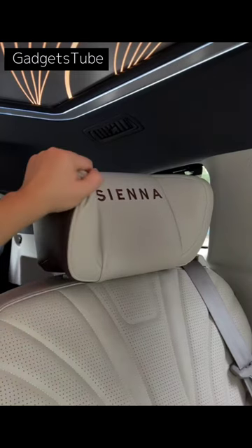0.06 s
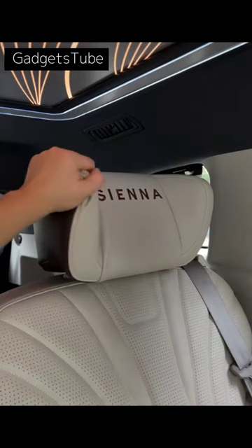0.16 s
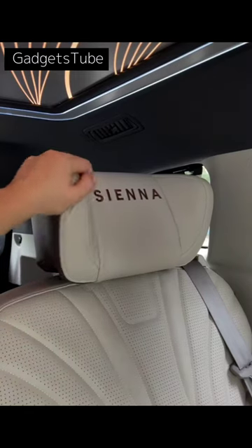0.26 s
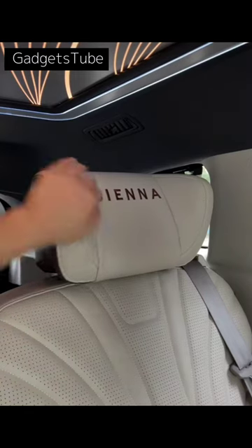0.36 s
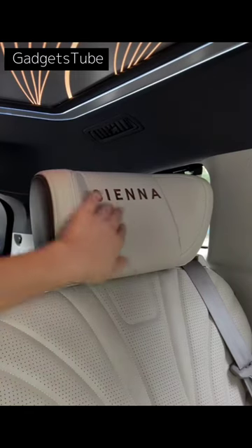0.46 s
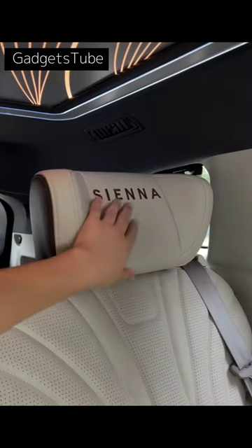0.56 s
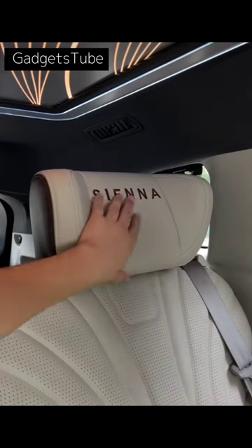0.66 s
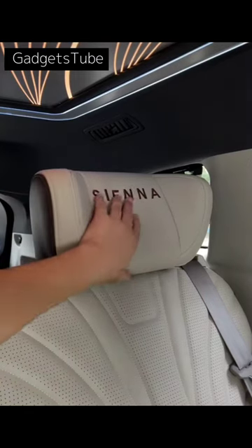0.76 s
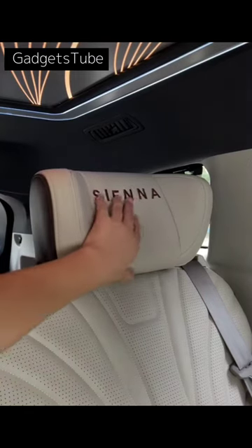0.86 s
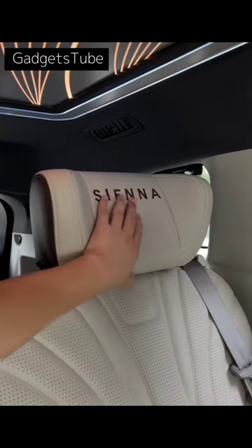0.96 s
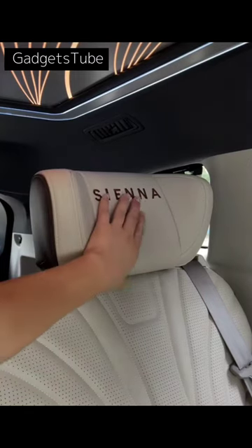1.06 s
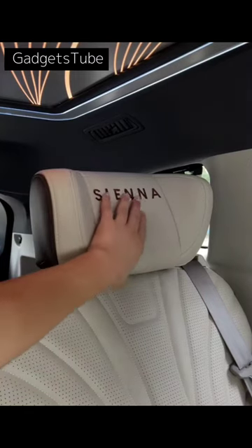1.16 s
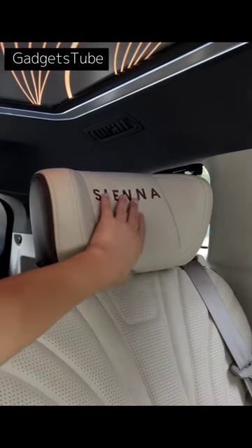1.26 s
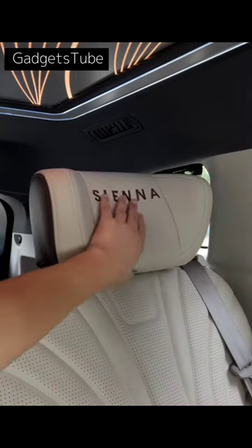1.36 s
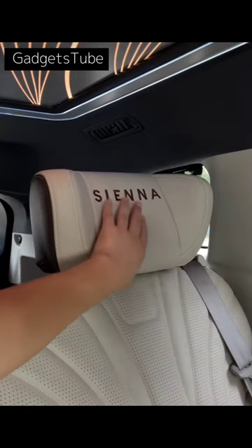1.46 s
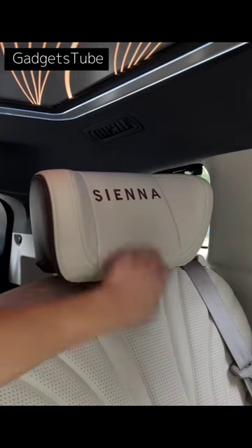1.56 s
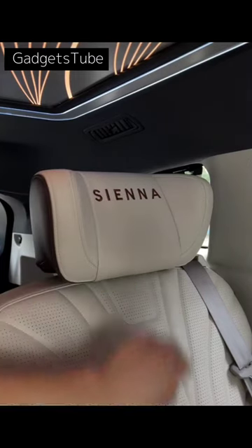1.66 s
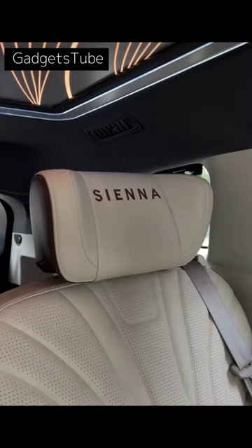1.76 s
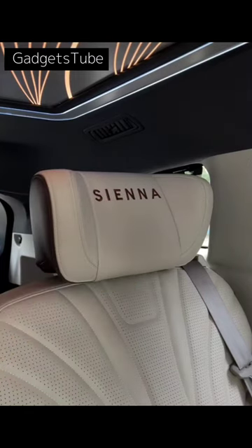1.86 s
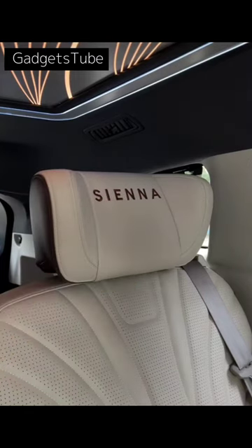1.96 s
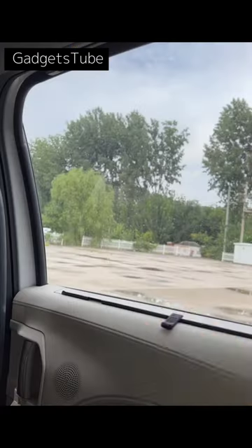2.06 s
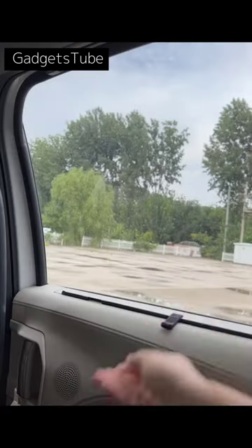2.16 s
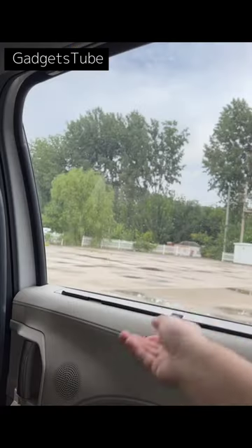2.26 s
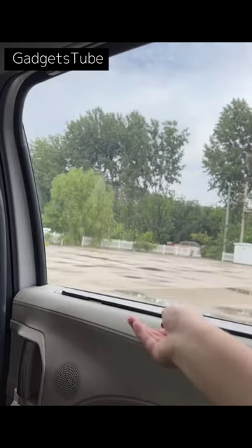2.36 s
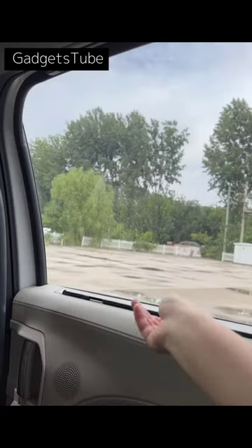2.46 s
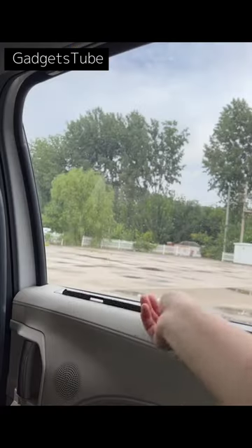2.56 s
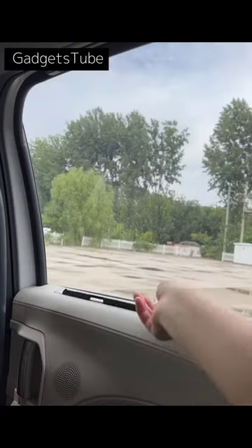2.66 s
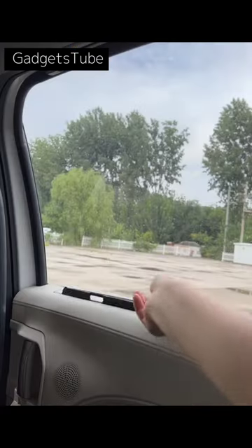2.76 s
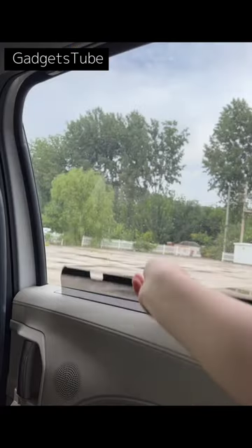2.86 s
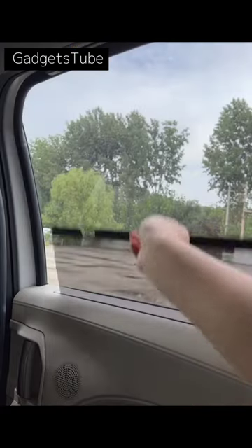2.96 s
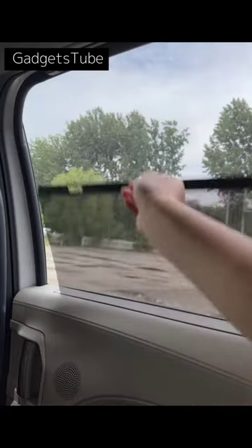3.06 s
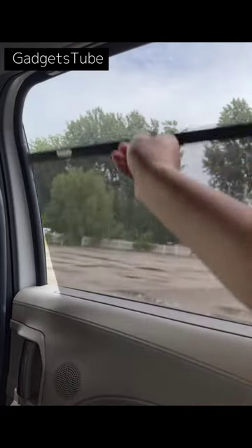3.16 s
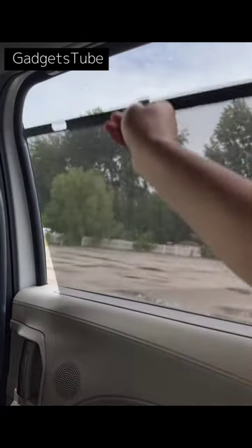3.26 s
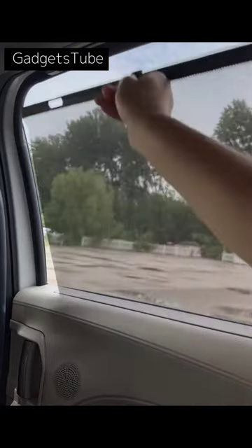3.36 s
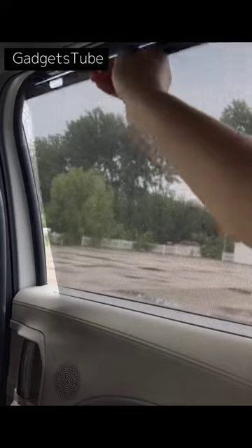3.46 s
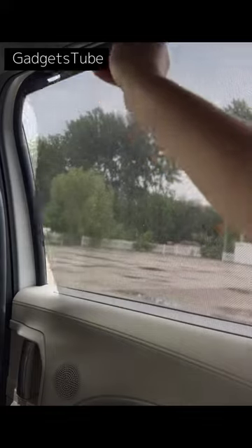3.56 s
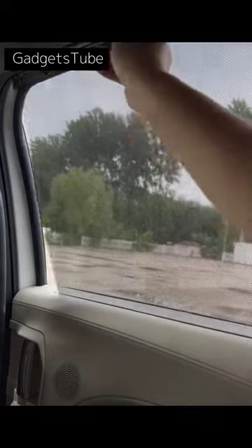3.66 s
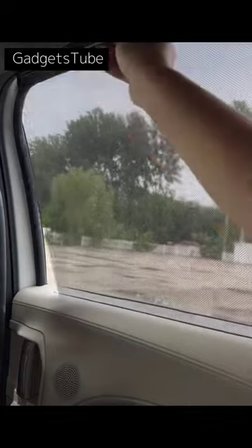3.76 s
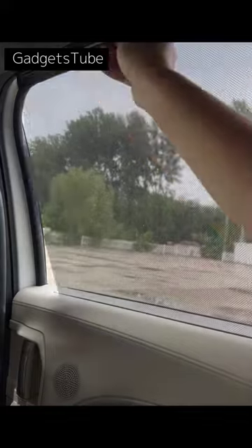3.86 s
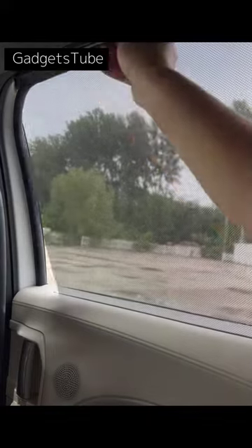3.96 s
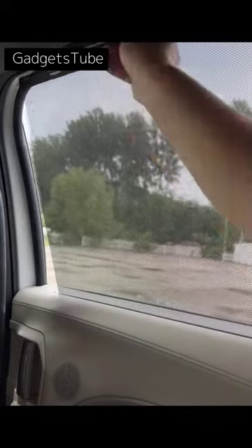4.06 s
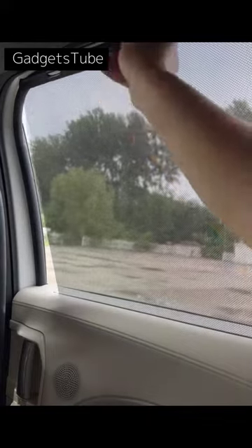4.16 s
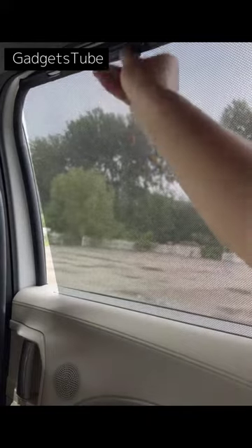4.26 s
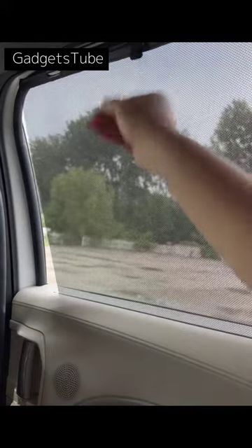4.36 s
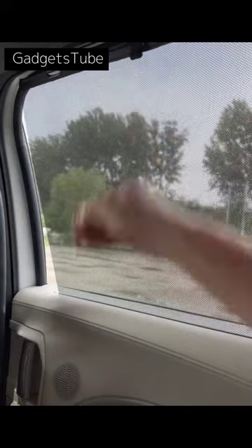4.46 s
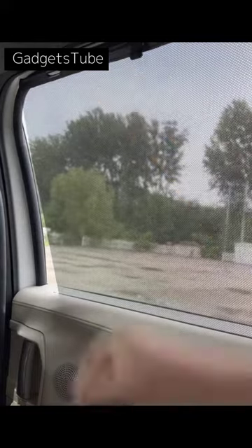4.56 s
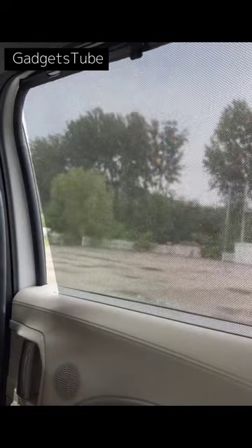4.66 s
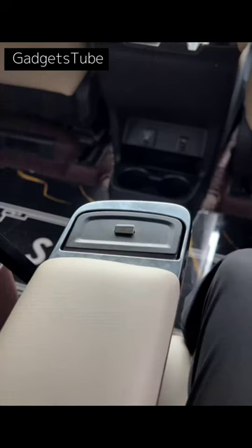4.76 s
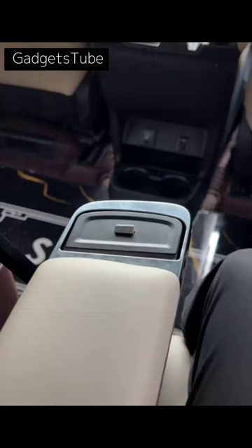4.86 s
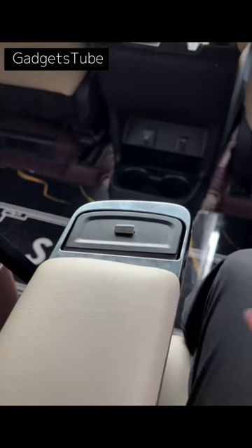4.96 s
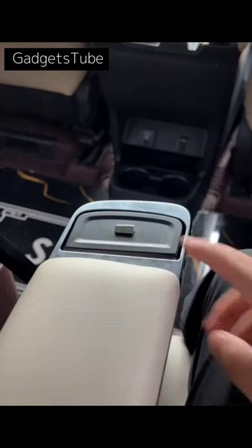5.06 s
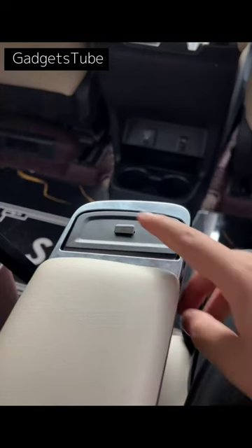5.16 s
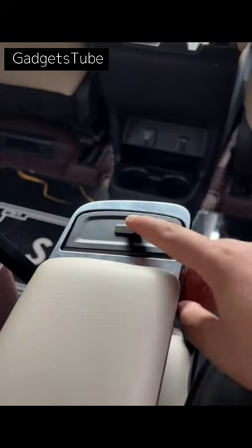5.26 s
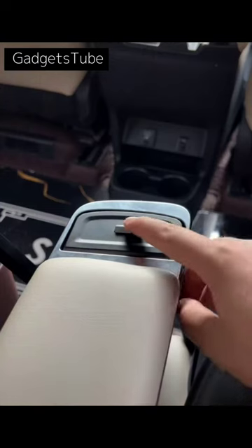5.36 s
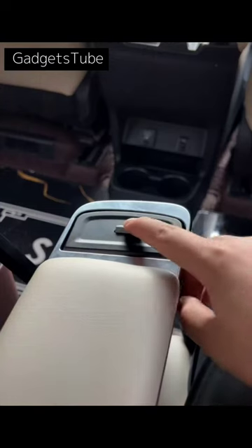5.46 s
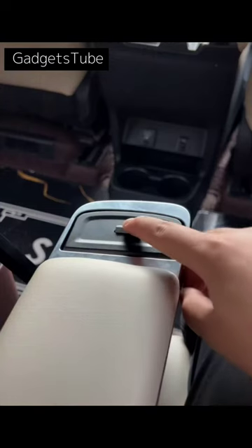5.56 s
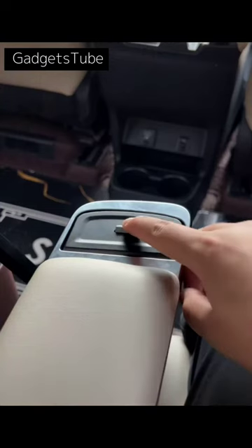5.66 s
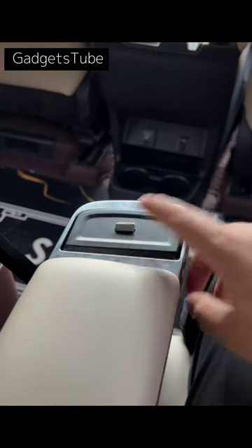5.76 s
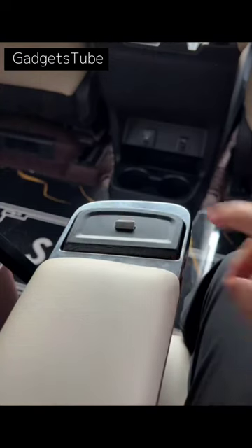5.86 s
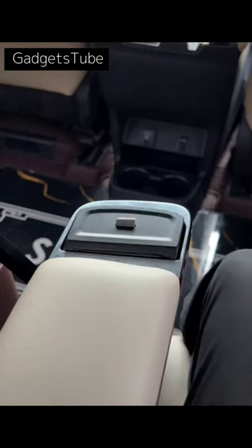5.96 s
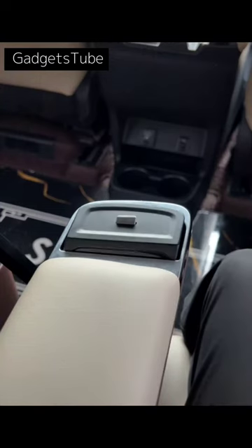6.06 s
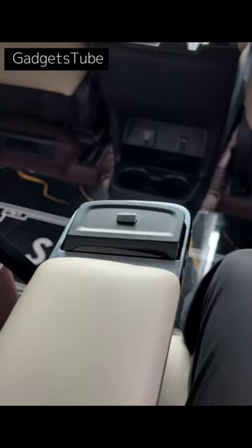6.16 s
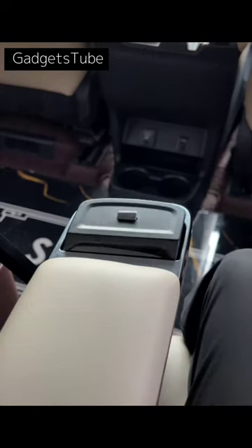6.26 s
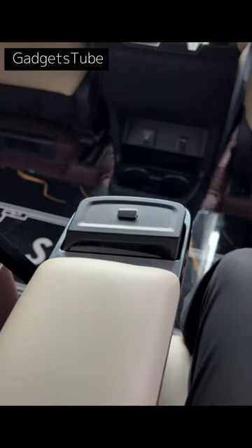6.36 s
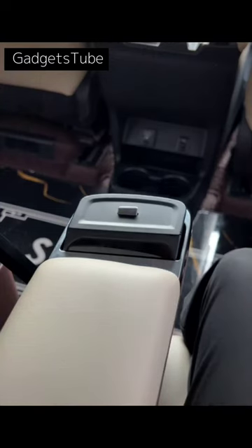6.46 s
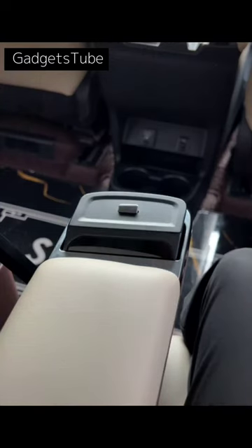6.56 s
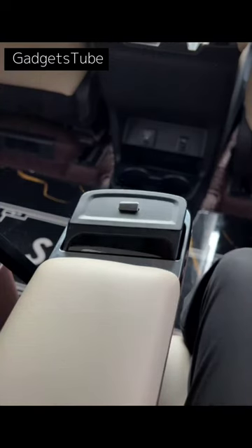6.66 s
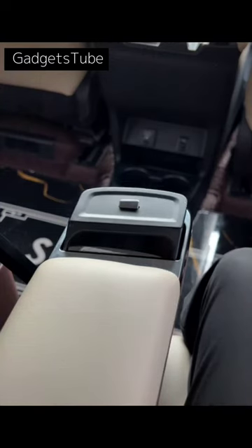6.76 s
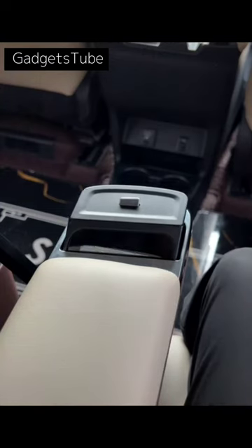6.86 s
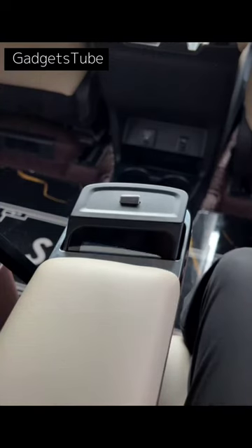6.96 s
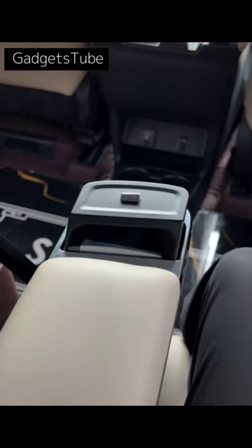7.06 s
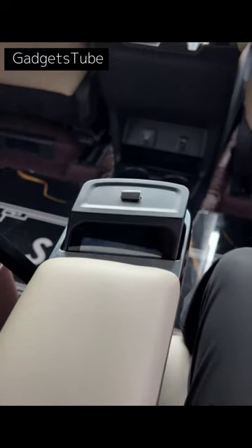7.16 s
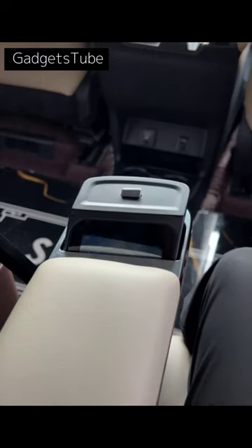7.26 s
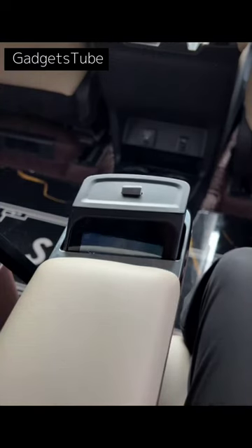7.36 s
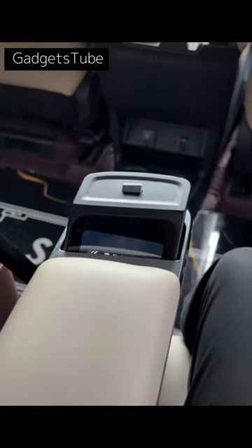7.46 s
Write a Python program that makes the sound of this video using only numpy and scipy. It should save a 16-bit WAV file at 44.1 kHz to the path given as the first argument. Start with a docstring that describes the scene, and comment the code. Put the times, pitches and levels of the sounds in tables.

```python
"""Inside a parked van, a hand strokes and bends a leather headrest over a low hum that stops at 2.06 s.
A roller blind is then gripped and pulled up the side window, its mesh hissing and singing lower and lower.
It is hooked in with a thump, and the hollow door booms on. Fingertips land on a lid and a button clicks.
A latch lets go, and a small geared motor hums and whines as it raises a screen along scraping rails.
Rubbing is made from random slips, knocks from dying resonances, and the motor from multiples of its shaft speed."""
import sys
import numpy as np
from scipy import signal
from scipy.fft import rfft, irfft, next_fast_len
from scipy.io import wavfile
from scipy.ndimage import uniform_filter1d

SR = 44100
rng = np.random.default_rng(int(sys.argv[2]) if len(sys.argv) > 2 else 0)


def wav_out(sig):
    """Save sig, one row per channel (or a flat mono array), as 16-bit PCM at SR to the path in sys.argv[1]."""
    wavfile.write(sys.argv[1], SR, np.round(np.clip(np.atleast_2d(sig).T, -1, 1) * 32767).astype(np.int16))


N = 331720
TIME = np.arange(N) / SR


def amp(db):
    """Turns decibels into a plain gain."""
    return 10 ** (np.asarray(db) / 20)


def unit(x):
    """Scales a sound to an rms of 1."""
    return x / np.sqrt(np.mean(x ** 2) + 1e-20)


def read(points, hz):
    """Reads a table between its points, along a log-frequency axis."""
    f, value = np.transpose(points)
    return np.interp(np.log(hz + 1), np.log(f + 1), value)


def follow(points, **ends):
    """Reads a table of (time, value) at every sample."""
    return np.interp(TIME, *np.transpose(points), **ends)


def add(mix, s, sound):
    """Adds a short sound to the mix at s seconds."""
    part = mix[:, round(s * SR):][:, :sound.shape[-1]]
    part += sound[..., :part.shape[1]]


def colour(x, spectrum):
    """Filters a sound by a table of (frequency [Hz], level [dB])."""
    size = next_fast_len(N, real=True)
    gain = amp(read(spectrum, np.fft.rfftfreq(size, 1 / SR)))
    return irfft(rfft(x, size) * gain, size)[..., :N]


def drift(hz):
    """Random wandering with an rms of 1, mostly slower than hz."""
    t = TIME[::64]
    smoothing = 1 + (np.fft.rfftfreq(len(t), t[1]) / hz) ** 4
    slow = irfft(rfft(rng.standard_normal(len(t))) / smoothing, len(t))
    return np.interp(TIME, t, unit(slow))


def stereo(pair):
    """Puts the direct sound in the middle and cabin reflections at the sides."""
    direct, reflected = pair
    return np.array([direct + .4 * reflected, direct - .4 * reflected])


def widen(pair, spectrum):
    """Spreads a sound between the microphones, band by band."""
    middle = pair.mean(0)
    return middle + colour(pair - middle, spectrum)


def noise(spectrum):
    """Steady coloured noise with an rms of 1."""
    return unit(stereo(colour(rng.standard_normal((2, N)), spectrum)))


def friction(spectrum, slips_per_s, spread_db, patchy_db):
    """Tiny slips of uneven size, coloured by the surface; its level flickers in patches over time and pitch."""
    slips = rng.random(N) < slips_per_s / SR
    size = slips * amp(spread_db * np.minimum(rng.exponential(1, N), 4))
    z = signal.stft(colour(size * rng.standard_normal((2, N)), spectrum), nperseg=512)[2]
    # random patches, smoothed over frequency and then over time
    patches = uniform_filter1d(rng.standard_normal(z.shape[1:]), size=4, axis=0)
    patches = unit(uniform_filter1d(patches, size=7, axis=1))
    return unit(stereo(signal.istft(z * amp(patchy_db * patches), nperseg=512)[1][:, :N]))


def ramp(start, rise_s):
    """Rises smoothly from 0 to 1 and stays there."""
    return np.sin(np.pi / 2 * np.clip((TIME - start) / rise_s, 0, 1)) ** 2


LAND_S, SLOWING_DB_PER_S, LIFT_DB_PER_S = 0.05, 59, 432


def rub(start, length):
    """Gain of one rub: it lands, fades as it slows, and lifts off."""
    t = np.maximum(TIME - start, 0)
    lift = np.maximum(t - length, 0)
    return ramp(start, LAND_S) * amp(-SLOWING_DB_PER_S * t - LIFT_DB_PER_S * lift)


# colour of the cabin air: (frequency [Hz], level [dB])
AIR = [(15, -41), (25, -3), (66, 5), (925, -33), (1950, -25.5), (3330, -35), (5930, -34), (9500, -39),
       (12000, -70.5)]
# how wide the air spreads: (frequency [Hz], extra width [dB])
AIR_WIDTH = [(70, 9), (200, 16.5), (900, 16.5), (2000, 6.5), (8000, -2)]
# colour of the early low hum: (frequency [Hz], level [dB])
LOW_HUM = [(20, -46), (52, 4), (72, 4), (98, -5), (126, 5.5), (150, -7), (195, -15), (265, -8),
           (320, -24.5), (2000, -78)]
AIR_DB, LOW_HUM_DB, LOW_HUM_END_S = -49, -30.5, 2.06


def cabin():
    """Faint air comes from all round and wavers; a low hum of filtered noise cuts out."""
    waver_db = 1.4 * drift(hz=8)
    air = amp(AIR_DB + waver_db) * widen(noise(AIR), AIR_WIDTH)
    running = np.clip((LOW_HUM_END_S - TIME) / 0.0061, 0, 1)
    return air + amp(LOW_HUM_DB) * running * noise(LOW_HUM)


# hand on leather and cloth: (time [s], length [s], friction level [dB], padding level [dB])
STROKES = [(-0.006, 0.17, -51, -48), (0.23, 0.088, -38.5, -40.5), (0.303, 0.11, -38, -40),
           (0.408, 0.24, -33.5, -38.5), (0.625, 0.15, -47.5, -39.5), (0.978, 0.19, -45.5, -37.5),
           (1.48, 0.062, -39, -29), (1.535, 0.055, -32, -62), (2.057, 0.023, -36.5, -30.5),
           (4.172, 0.13, -51.5, -44), (4.673, 0.035, -66, -38.5), (4.871, 0.25, -44, -81)]
# colour of skin on leather: (frequency [Hz], level [dB])
LEATHER = [(700, -14), (1200, -12.5), (2600, -5.5), (4600, -10.5), (7600, -6.5), (10500, -22.5),
           (13000, -39)]
# colour of the foam under the leather: (frequency [Hz], level [dB])
PADDING = [(150, -18), (330, 0), (550, -5), (900, -14), (1400, -14), (4000, -45)]


def hand():
    """Skin drags over leather in tiny slips; the padding answers dully."""
    grain = friction(LEATHER, slips_per_s=19000, spread_db=-0.5, patchy_db=2.5)
    padding = friction(PADDING, slips_per_s=3500, spread_db=1.0, patchy_db=3.5)
    return sum(rub(s, length) * (amp(grain_db) * grain + amp(padding_db) * padding)
               for s, length, grain_db, padding_db in STROKES)


# short hard clicks, mostly of plastic trim; the faint one at 4.734 s comes just before a gap:
# (time [s], body level [dB], then against the body: low [dB], edge [dB], tick [dB];
# base decay time t60 [s])
CLICKS = [(0.794, -42.5, -2, 0.5, 2, 0.037), (1.008, -28.5, 7.5, -10.5, -11, 0.061),
          (1.248, -38.5, 4, -8.5, -7, 0.097), (1.507, -24.5, 8, -21, -34, 0.048),
          (2.091, -28, -1.5, -16, -42, 0.073), (2.281, -38.5, 2, -40, -35, 0.12),
          (2.355, -33.5, 21.5, -40, -24.5, 0.11), (2.501, -16, 0.5, -17.5, -25.5, 0.043),
          (2.545, -8, -9, -18.5, -31.5, 0.033), (2.571, -19, 7, -24, -33, 0.068),
          (2.679, -33.5, -3.5, -17.5, -25, 0.079), (2.848, -18.5, -12, -8.5, -37, 0.22),
          (3.566, -16, -1.5, -12, -36, 0.081), (3.661, -17.5, 9.5, -13.5, -22.5, 0.094),
          (3.805, -31.5, 6.5, -16.5, -12, 0.04), (3.815, -23, 0.5, -17.5, -26.5, 0.11),
          (3.845, -29, 12, -16.5, -27, 0.058), (4.045, -6.5, 7, -16, -18, 0.076),
          (4.061, -11, 5, -0.5, -3.5, 0.063), (4.734, -38, 7, -9.5, -8.5, 0.055),
          (5.598, -23.5, -2.5, -8, -21, 0.11), (5.71, -6, -19, -1.5, -10.5, 0.093),
          (5.718, -6, -9, -14.5, -26, 0.096), (5.728, -9, -8.5, -16, -15, 0.16),
          (5.743, -11, 0.5, -0.5, -12, 0.088)]
# how decay varies with pitch: (frequency [Hz], factor on the base decay time)
RING = [(100, 4), (300, 1.5), (800, 0.93), (2500, 0.97), (9000, 1.09)]
# resonances of the window frame: (frequency [Hz], level [dB])
FRAME = [(550, 0.5), (820, -4), (1150, 0.5), (1700, 1), (3200, -3), (4200, 0.5), (5000, -5.5), (6400, 5),
         (8000, -2.5)]
# resonances of the console, where the latch lets go: (frequency [Hz], level [dB])
CONSOLE = [(720, -3), (1150, -8), (1700, -0.5), (2100, -6.5), (2400, 2), (3700, -7.5), (4500, -0.5),
           (5300, -6.5)]
CONSOLE_FROM_S = 5  # later clicks take the console's colour, earlier ones the frame's


def clicks(rise_share=0.013, crack_db=3, crack_s=0.0017, tail_db=-19, tail_t60=0.14):
    """Each click cracks, rings in many dense modes, and dies fast with a short faint tail."""
    frame, console = np.zeros((2, N)), np.zeros((2, N))
    t = np.arange(SR // 3) / SR
    hz = np.fft.rfftfreq(len(t), 1 / SR)
    centres = np.geomspace(110, 14080, 15)  # half-octave steps [Hz]
    bands = [np.sqrt(np.maximum(1 - 2 * abs(np.log2((hz + 1) / c)), 0)) for c in centres]
    for s, db, low, edge, tick, t60 in CLICKS:
        blow = [(100, low - 20), (230, low - 11), (450, -10.5), (800, -11.5),
                (1500, edge - 8), (3000, edge - 10),
                (4500, tick - 8), (6500, tick - 9), (10000, tick - 26), (14000, tick - 46)]
        modes = stereo(rfft(rng.standard_normal((2, len(t)))))
        attack = 1 - np.exp(-t / (rise_share * t60))  # long clicks also start softly
        tail = amp(tail_db - 60 * t / tail_t60)
        for centre, band in zip(centres, bands):
            dying = amp(-60 * t / (t60 * read(RING, centre))) + tail
            # the crack is strongest in the treble
            crack = amp(crack_db) * np.exp(-t / crack_s) * centre / (centre + 1200)
            shape = dying * attack * (1 + crack)
            ring = unit(irfft(modes * band, len(t)) * shape) * np.sqrt(np.mean(shape ** 2))
            add(console if s > CONSOLE_FROM_S else frame, s, amp(db + read(blow, centre)) * ring)
    return colour(frame, FRAME) + colour(console, CONSOLE)


# blows that set a panel swinging: (time [s], level [dB], panel frequency [Hz], decay time t60 [s])
THUDS = [(1.012, -16.5, 137, 0.12), (1.509, -16.5, 127, 0.073), (2.358, -11, 61.4, 0.092),
         (2.363, -7.5, 106.4, 0.13), (2.414, -15.5, 90, 0.13), (2.546, -19, 446, 0.23),
         (2.572, -16, 325, 0.07), (2.589, -6, 63, 0.075), (2.645, -4, 86.8, 0.049), (3.576, -8, 387, 0.05),
         (3.665, 0, 206, 0.11), (3.688, -5.5, 93, 0.14), (3.821, -18.5, 209, 0.124),
         (4.043, -9, 220.5, 0.075), (4.055, -12, 116, 0.043), (4.074, 8.5, 86, 0.068), (4.12, 7, 81, 0.044),
         (4.698, -24.5, 163.4, 0.12), (5.712, -6, 733, 0.1), (5.742, -17, 206, 0.21)]
# small panels radiate little deep bass: (frequency [Hz], level [dB])
BASS_ROLL = [(15, -37), (35, -18), (60, -0.5)]


def thuds(rise_cycles=0.6, partner=1.3, partner_db=-11):
    """A panel swings up to its lowest mode, with a weaker and shorter one above."""
    out, t = np.zeros((2, N)), np.arange(SR // 2) / SR
    for s, db, hz, t60 in THUDS:
        dying = amp(-60 * t / t60)
        swing = np.sin(2 * np.pi * hz * t) * dying
        swing = swing + amp(partner_db) * np.sin(2 * np.pi * hz * partner * t) * dying ** 2
        attack = 1 - np.exp(-(t * hz / rise_cycles) ** 2)
        add(out, s, amp(db) * swing * attack)
    return colour(out, BASS_ROLL)


LOW_MODES_HZ = 1400


def struck(hits, modes, t60, crack_db, echo_db, echo_t60, scatter, rise_s):
    """A small part cracks and rings a new cluster of modes at each hit; the cabin adds a short echo."""
    out, t = np.zeros((2, N)), np.arange(SR // 5) / SR
    centre, mode_db = np.repeat(np.transpose(modes), 2, axis=1)[:, :, None]  # two modes to each entry
    crack_band = signal.butter(2, [1300, 4000], "band", fs=SR, output="sos")
    for s, db, low_db in hits:
        hz = centre * np.exp(scatter * rng.uniform(-1.3, 1, centre.shape))
        dying = amp(-60 * t / t60 * (hz / LOW_MODES_HZ) ** .5)  # higher modes die sooner
        rings = rng.choice([-1, 1], hz.shape) * np.sin(2 * np.pi * hz * t) * dying
        ring = (rings * amp(mode_db + low_db * (centre < LOW_MODES_HZ))).sum(0) / np.sqrt(2)
        crack = signal.sosfilt(crack_band, rng.standard_normal(len(t)) * np.exp(-t / .003))
        ring = (ring + amp(crack_db) * crack) * (1 - np.exp(-t / rise_s))
        echo = unit(stereo(rng.standard_normal((2, len(t)))) * amp(-60 * t / echo_t60)) / np.sqrt(len(t))
        echoed = signal.fftconvolve(ring[None], echo, axes=1)[:, :len(t)]
        add(out, s, amp(db) * (ring + amp(echo_db) * echoed))
    return out


# the headrest's hinge clicks as it bends: (time [s], level [dB], extra level of the low modes [dB])
NOTCHES = [(1.321, -42, 8), (1.333, -40.5, 8), (1.406, -38.5, 7)]
# a fingertip lands on the lid: (time [s], level [dB], extra level of the low modes [dB])
TOUCHES = [(5.302, -47.5, 3), (5.429, -38, -10), (5.443, -32, -12), (5.463, -40, -10)]
# the button gives, then snaps in: (time [s], level [dB], extra level of the low modes [dB])
PRESSES = [(5.588, -47, -6.5), (5.596, -13, 3)]
# the carriage catches on its rails; the rails' scrape uses these times and levels too:
# (time [s], level [dB], extra level of the low modes [dB])
CATCHES = [(6.028, -28, -7), (6.046, -34, 2.5), (6.142, -28, -3), (6.231, -28, -3), (6.352, -32, 2),
           (6.508, -33, 7.5), (6.572, -38, 9.5), (6.648, -33, 1), (6.762, -37, 9)]
# modes of the four parts: (frequency [Hz], level [dB])
HINGE = [(450, -1.5), (1230, 0.5), (2300, -3)]
LID = [(1300, -9), (1800, 7.5), (3150, 10), (4280, -3)]
BUTTON = [(1100, 3), (1480, 9.5), (1800, 12), (2300, 2), (3120, 3.5), (4170, -9)]
CARRIAGE = [(600, -9), (720, 4.5), (880, -1.5), (1800, -3), (2900, -4), (3400, 1.5)]


def fittings():
    """The headrest's hinge, the lid, its button and the screen's carriage each click with their own dry ring."""
    hinge = struck(NOTCHES, HINGE, t60=.008, crack_db=3, echo_db=6, echo_t60=.13,
                   scatter=.25, rise_s=.0015)
    lid = struck(TOUCHES, LID, t60=.011, crack_db=5, echo_db=1, echo_t60=.12,
                 scatter=.09, rise_s=.0012)
    button = struck(PRESSES, BUTTON, t60=.009, crack_db=11, echo_db=-8, echo_t60=.1,
                    scatter=.14, rise_s=.0003)
    carriage = struck(CATCHES, CARRIAGE, t60=.035, crack_db=-6, echo_db=2, echo_t60=.13,
                      scatter=.08, rise_s=.003)
    return hinge + lid + button + carriage


# speed of the pull, with one early hitch: (time [s], speed [0-1])
PULL = [(2.78, 0.1), (2.88, 0.86), (2.95, 0.54), (3.04, 0.8), (3.13, 0.82), (3.23, 0.66), (3.35, 0.49),
        (3.5, 0.41), (3.69, 0.06)]
# colour of the long mesh: (frequency [Hz], level [dB])
FABRIC = [(880, -27), (1500, -3), (2150, -2.5), (4100, -7), (5000, -11), (5900, -4), (6600, -10),
          (8200, -12), (10500, -25), (13000, -65)]
# extra filter while little mesh is out: (frequency [Hz], level [dB])
SHORT_MESH = [(900, -19), (2000, -8.5), (4200, -1.5), (6000, -2.5)]
# colour of the roller's case: (frequency [Hz], level [dB])
CASSETTE = [(120, -20), (190, 3), (300, .5), (460, 0), (730, -10), (1000, -7), (1500, -11), (2300, -22),
            (5000, -80)]
# the stretched mesh sings lower as it grows longer: (time [s], pitch [Hz] before a slight wander)
MESH_PITCH = [(3.0, 610), (3.06, 582), (3.11, 512), (3.19, 408), (3.26, 312), (3.33, 290), (3.39, 238),
              (3.5, 228)]
# partials of the singing: (multiple of the pitch, relative level [dB])
SING = [(1, -1), (2, 0), (3, -6), (5, -13)]
# colour of the hollow door, used by its boom as well: (frequency [Hz], level [dB])
DOOR = [(20, -43.5), (50, -3), (70, 6), (113, -2), (145, -14.5), (210, -16), (450, -110.5)]
# the fingers work the handle loose
GRIP_S, GRIP_LENGTH_S, GRIP_HISS_DB, GRIP_CASSETTE_DB = 2.46, 0.19, -41, -28.5
# each part of the blind: dB at a speed of 1, and the power of the speed that it follows
MESH_DB, MESH_POWER = -29, 1
CASSETTE_DB, CASSETTE_POWER = -30, 0.19
SING_DB, SING_POWER = -30.8, 0.58
RUMBLE_DB, RUMBLE_POWER = -16, 1.3
# the tug builds; the mesh sings and the door shakes once the bar has cleared the slot
TUG_S, CLEAR_S, CLEAR_RISE_S = 0.08, 2.827, 0.24
UNROLLED = 0.7  # share of the pull after which the mesh has its full colour


def blind():
    """Mesh hisses and sings lower as it lengthens, and the door rumbles: all follow the speed of the pull."""
    speed = follow(PULL, left=0, right=0)
    tug = ramp(PULL[0][0], TUG_S)
    clear = ramp(CLEAR_S, CLEAR_RISE_S)
    grip = rub(GRIP_S, GRIP_LENGTH_S)

    unrolled = np.minimum(np.cumsum(speed) / speed.sum() / UNROLLED, 1) ** 2
    hiss = friction(FABRIC, slips_per_s=8000, spread_db=1.4, patchy_db=2.0)
    hiss = unrolled * hiss + (1 - unrolled) * colour(hiss, SHORT_MESH)
    hiss = hiss * (tug * amp(MESH_DB) * speed ** MESH_POWER + amp(GRIP_HISS_DB) * grip)

    cassette = friction(CASSETTE, slips_per_s=12000, spread_db=.6, patchy_db=1.2)
    cassette = cassette * (tug * amp(CASSETTE_DB) * speed ** CASSETTE_POWER
                           + amp(GRIP_CASSETTE_DB) * grip)

    cycles = np.cumsum(follow(MESH_PITCH) * (1 + .011 * drift(hz=70))) / SR
    sing = unit(sum(amp(db) * np.sin(2 * np.pi * k * cycles) * (1 + .65 * drift(hz=15)) for k, db in SING))
    sing = sing * amp(SING_DB) * speed ** SING_POWER
    rumble = noise(DOOR) * amp(RUMBLE_DB) * speed ** RUMBLE_POWER
    return hiss + cassette + clear * (sing + rumble)


# the door booms on after a heavy blow: (time [s], level [dB] before its rise and decay)
BOOMS = [(2.56, -22.5), (3.649, -13), (4.08, -14)]
BOOM_RISE_S, BOOM_T60 = 0.052, 0.65


def door():
    """The hollow door swells after each heavy blow and dies away."""
    swells = sum(ramp(s, BOOM_RISE_S) * amp(db - 60 * np.maximum(TIME - s, 0) / BOOM_T60)
                 for s, db in BOOMS)
    return noise(DOOR) * swells


# drag of the guide rails, greatest in the middle of the travel: (time [s], drag [0-1])
DRAG = [(5.95, 0.02), (6.24, 0.77), (6.68, 0.76), (7.08, 0.15)]
# motor shaft, before its small wobble: (time [s], speed [turns a second])
SHAFT = [(5.76, 86.5), (6.05, 86.45), (6.3, 86.0), (6.9, 85.6), (7.52, 84.0)]
# low tones of the drive: (multiple of the shaft speed, relative level [dB])
HUM = [(2, -5.5), (4, 0.5), (6, -18.5), (7, -13.5), (9, -14.5), (10, -17)]
# high tones of the drive: (multiple of the shaft speed, relative level [dB])
WHINE = [(12, -17.5), (13, -21.5), (15, -19.5), (17, -16), (18, -7), (19, -17), (20, -12.5), (21, -11),
         (22, -16.5), (24, -0.5), (25, -16), (29, -10), (30, -14), (36, -15.5), (41, -23), (102, -30.5),
         (106, -27.5)]
START_S, SPIN_UP_S = 5.75, 0.096
# the hum builds as the gears take up the weight of the screen
HUM_DB, TAKE_UP_DB, TAKE_UP_S = -32.5, 9.5, 0.25
WHINE_DB, WHINE_DRAG_DB = -38, 4.5  # running free, and added at a drag of 1


def drive(gear_ratio=8.37, wobble=0.0035, jitter=0.0019, throb_db=2.3):
    """Multiples of the shaft speed hum and whine; speed and hum waver once per gear turn."""
    speed = follow(SHAFT)
    gear = 2 * np.pi * np.cumsum(speed * (TIME > START_S)) / SR / gear_ratio
    turns = np.cumsum(speed * (1 + wobble * np.sin(gear) + jitter * drift(hz=56.9))) / SR

    def tones(orders, flutter_db, flutter_hz, spread=0.42):
        """Each tone flutters on its own and reaches the two microphones out of step."""
        out, ports = np.zeros((2, N)), spread * np.array([[1], [-1]])
        for k, db in orders:
            phase = 2 * np.pi * (k * turns + rng.random()) + (-1) ** k * ports
            out += amp(db + flutter_db * drift(hz=flutter_hz)) * np.sin(phase)
        return np.sqrt(2) * out

    slack = np.exp(-np.maximum(TIME - START_S, 0) / TAKE_UP_S)
    hum = tones(HUM, flutter_db=1.3, flutter_hz=22)
    hum = hum * amp(HUM_DB - TAKE_UP_DB * slack - throb_db * np.cos(gear))
    whine = tones(WHINE, flutter_db=1.4, flutter_hz=80)
    # tooth impacts add a faint comb of high multiples
    teeth = unit(sum(rng.exponential() * np.sin(2 * np.pi * (k * turns + rng.random())) / k
                     for k in range(38, 72)))
    whine = (whine + amp(-20) * teeth) * amp(WHINE_DB + WHINE_DRAG_DB * follow(DRAG))
    return ramp(START_S, SPIN_UP_S) * (hum + whine)


# colour of the guide rails: (frequency [Hz], level [dB])
RAIL = [(60, -12), (120, 0), (330, 1.5), (700, 0.5), (1050, -4), (1300, -6.5), (1800, -1.5), (2800, -5.5),
        (3400, -11.5), (3800, -23), (6000, -57)]
# colour of the seal round the screen: (frequency [Hz], level [dB])
SEAL = [(2200, -20.5), (4800, -18), (5700, -17), (8200, -22.5), (9100, -20), (10200, -34), (11500, -68)]
# each part: dB running free, dB added at a drag of 1
RAIL_DB, RAIL_DRAG_DB = -41.5, 9.5
SEAL_DB, SEAL_DRAG_DB = -54, 5
SCRAPE_S, SCRAPE_DB = 0.012, -9.5  # half-width of a catch's scrape, and its level against the catch
RATTLE_DB, RATTLE_PER_S = -41.5, 130  # loose teeth: dB at a drag of 1, knocks a second
# the top of the screen brushes through the seal
BRUSH_S, BRUSH_LENGTH_S, BRUSH_DB = 6.1, 0.27, -39.5


def guides(judder_db=2.5):
    """The carriage grinds up its rails, scraping where it catches, and the screen rubs through the seal."""
    drag = follow(DRAG)
    scraping = sum(amp(db + SCRAPE_DB) * np.exp(-((TIME - s) / SCRAPE_S) ** 2) for s, db, _ in CATCHES)
    rail = friction(RAIL, slips_per_s=5000, spread_db=0.2, patchy_db=2.2)
    rail = rail * (scraping + amp(RAIL_DB + RAIL_DRAG_DB * drag))
    rail = rail * amp(judder_db * drag * drift(hz=45))
    rattle = friction(RAIL, slips_per_s=RATTLE_PER_S, spread_db=2.0, patchy_db=1.0)
    rattle = amp(RATTLE_DB) * drag * rattle
    seal = friction(SEAL, slips_per_s=12000, spread_db=-1.0, patchy_db=2.5)
    brush = amp(BRUSH_DB) * rub(BRUSH_S, BRUSH_LENGTH_S)
    seal = seal * (amp(SEAL_DB + SEAL_DRAG_DB * drag) + brush)
    return rail + rattle + seal


# colour of the shaking console: (frequency [Hz], level [dB])
SHAKE = [(25, -20), (70, 6.5), (120, -12), (300, -65)]
SHAKE_DB = -43.5


def motor():
    """The drive turns, its guides rub, and the console shakes evenly."""
    moving = ramp(START_S, 0.0057) * (guides() + amp(SHAKE_DB) * noise(SHAKE))
    return (drive() + moving) * amp([[.7], [-.7]])  # dB, left and right


# how wide the motor spreads: (frequency [Hz], extra width [dB])
MOTOR_WIDTH = [(100, 5.5), (500, -2), (950, 2.5), (1500, -3.5), (2200, -12.5), (3300, 1)]
# how far the motor leans to the left: (frequency [Hz], level [dB])
MOTOR_LEAN = [(70, -24), (170, -10), (340, -21), (2000, -60)]


def from_console(pair):
    """The motor sounds wide, and its hum reaches the left microphone more strongly."""
    lean = colour(pair.mean(0), MOTOR_LEAN)
    return widen(pair, MOTOR_WIDTH) + np.array([lean, -lean])


# where it sticks, the carriage squeaks or groans:
# (time [s], length [s], middle pitch [Hz] before a rough wander, peak level [dB])
SQUEAKS = [(6.2, 0.06, 3480, -37), (6.314, 0.022, 3430, -30), (6.328, 0.042, 690, -26)]


def squeaks(sag=.03, rough=.014):
    """Plastic sticks and slips on the rail: a rough tone that swells, sags in pitch and lets go."""
    out = np.zeros(N)
    for s, length, hz, db in SQUEAKS:
        along = np.clip((TIME - s) / length, 0, 1)
        pitch = hz * (1 - sag * (along - .5) + rough * drift(hz=200))
        out += amp(db) * np.sin(np.pi * along) * np.sin(2 * np.pi * np.cumsum(pitch) / SR)
    return out


# the sound drops out for an instant: (time [s], length [s])
GAPS = [(2.048, .016), (4.752, .022)]


def scene():
    """Everything that sounds in the cabin, with two brief gaps."""
    gap = sum(ramp(s, .002) - ramp(s + length, .002) for s, length in GAPS)
    others = cabin() + hand() + clicks() + thuds() + fittings() + blind() + door()
    return (1 - gap) * (others + from_console(motor()) + squeaks())


# how far the two close microphones differ: (frequency [Hz], level on the side signal [dB])
APART = [(60, -18), (170, -14), (350, -5), (650, 4), (950, 3), (1400, -1.5), (2200, -3.5), (3200, 0.5),
         (9000, 2)]
# how much of the middle leans to the left: (frequency [Hz], level [dB])
LEFT_LEAN = [(70, -48), (170, -16.5), (600, -22.5), (2500, -58)]
EDGE_HZ = 15600  # the treble above this is cut


def record(dry):
    """Close microphones hear the bass alike, the left one more of the middle; peaks past full scale are clipped."""
    middle = dry.mean(0)
    side = colour((dry[0] - dry[1]) / 2, APART) + colour(middle, LEFT_LEAN)
    heard = np.clip(middle + np.array([side, -side]), -1, 1)
    treble_cut = signal.firwin(511, EDGE_HZ, window=("kaiser", 9), fs=SR)
    return signal.oaconvolve(heard, treble_cut[None], "same")


dry = scene()
out = record(dry)
wav_out(out)
```